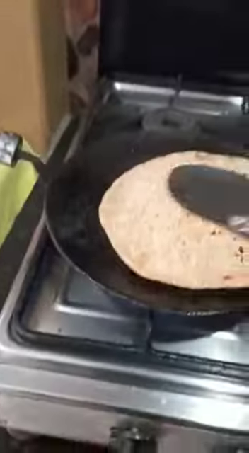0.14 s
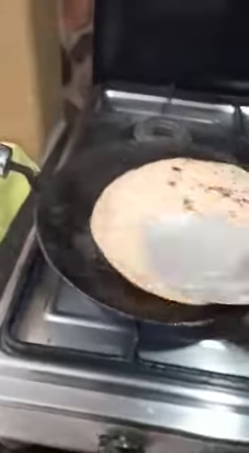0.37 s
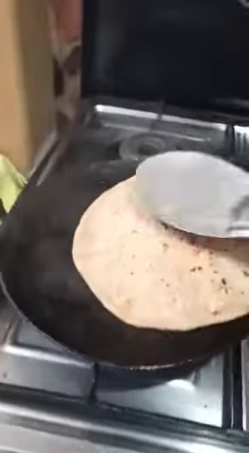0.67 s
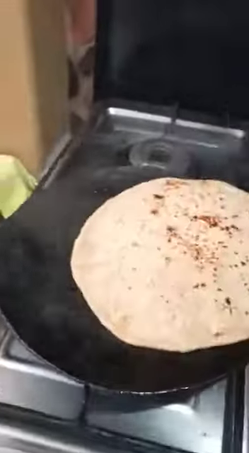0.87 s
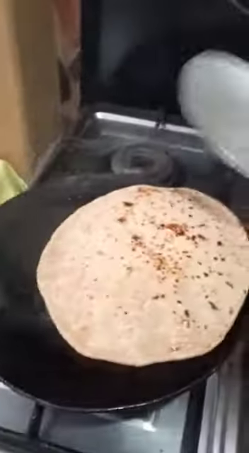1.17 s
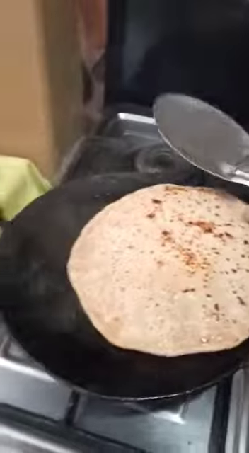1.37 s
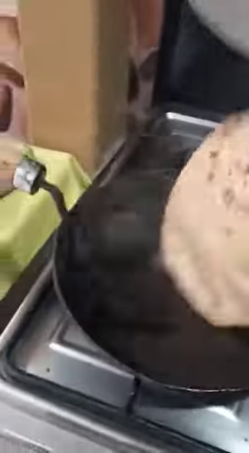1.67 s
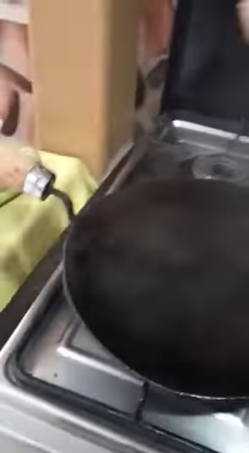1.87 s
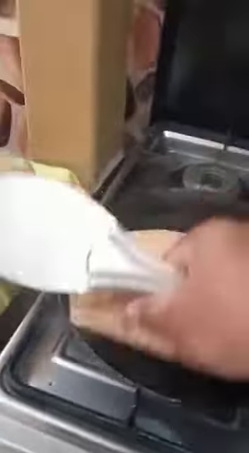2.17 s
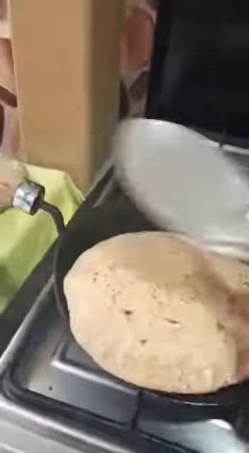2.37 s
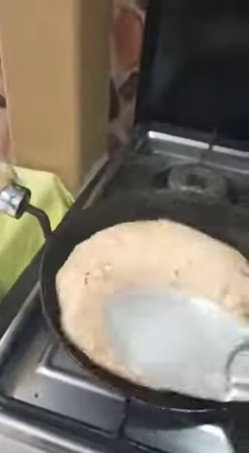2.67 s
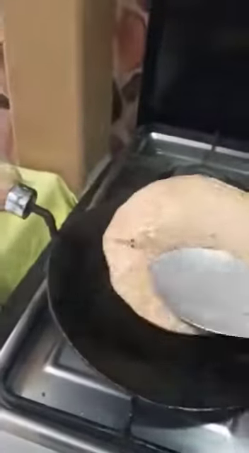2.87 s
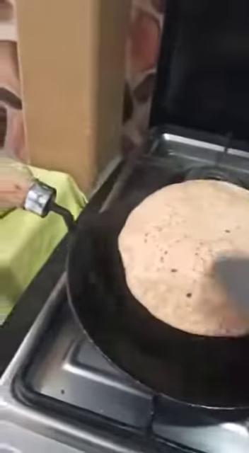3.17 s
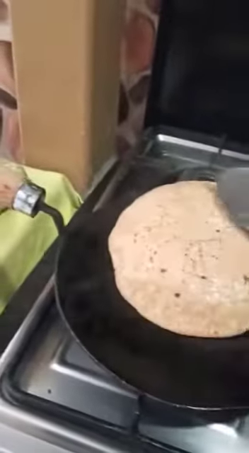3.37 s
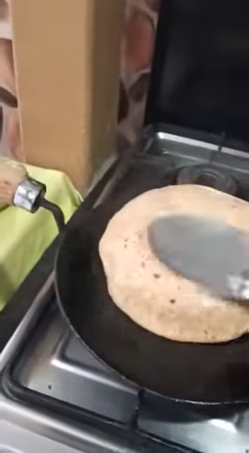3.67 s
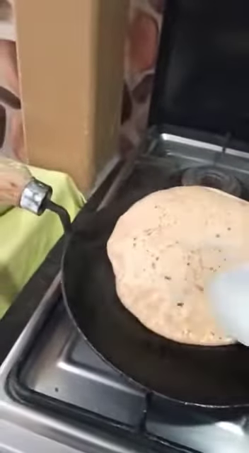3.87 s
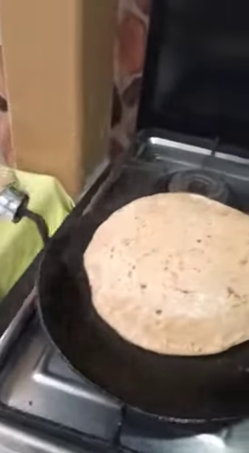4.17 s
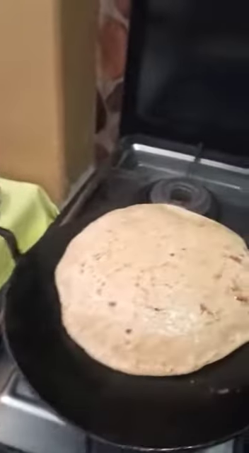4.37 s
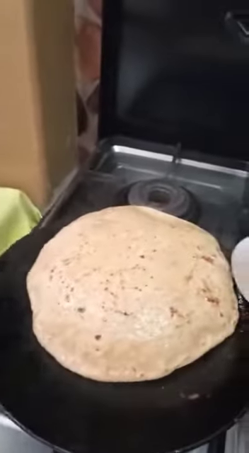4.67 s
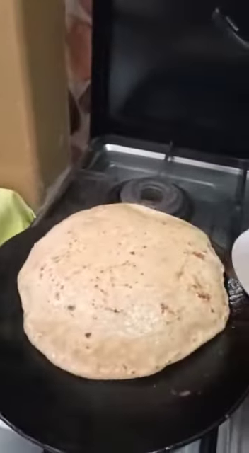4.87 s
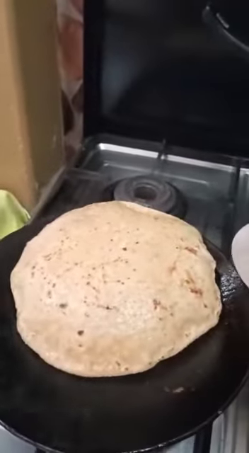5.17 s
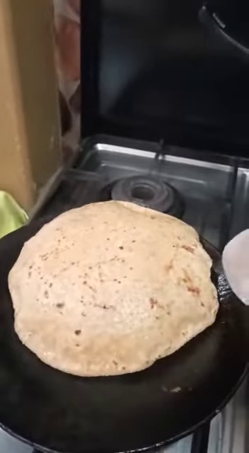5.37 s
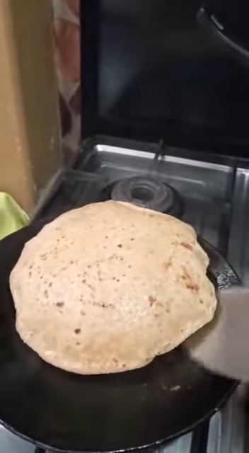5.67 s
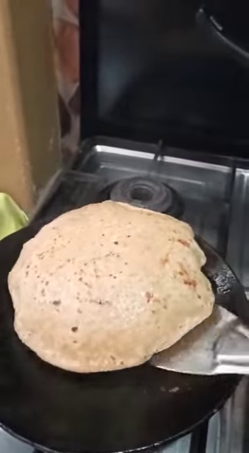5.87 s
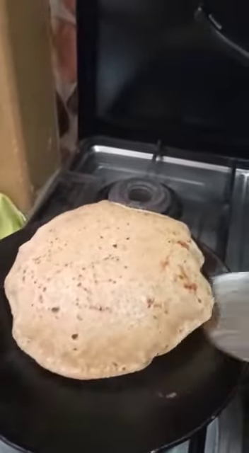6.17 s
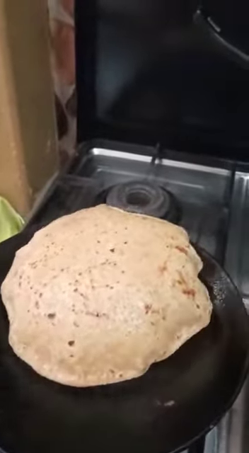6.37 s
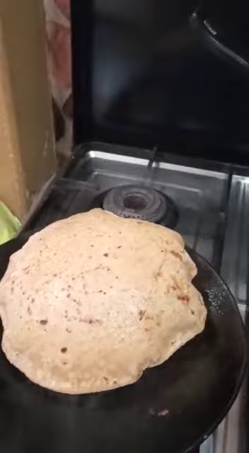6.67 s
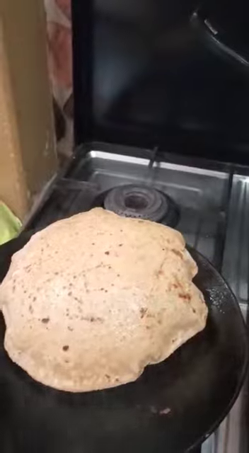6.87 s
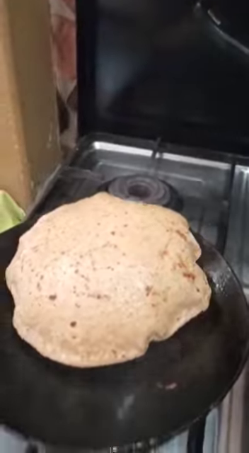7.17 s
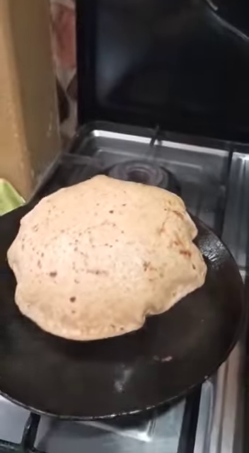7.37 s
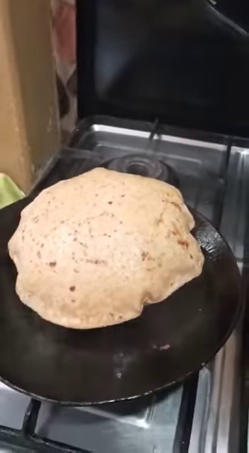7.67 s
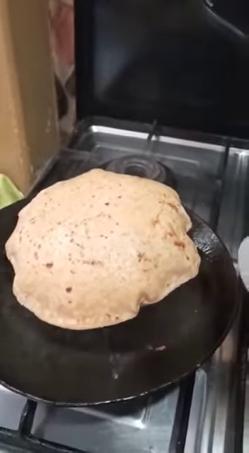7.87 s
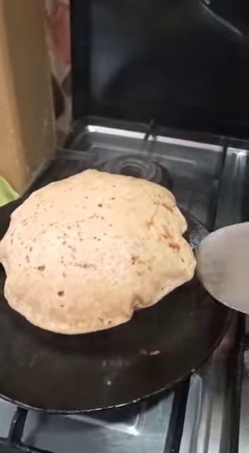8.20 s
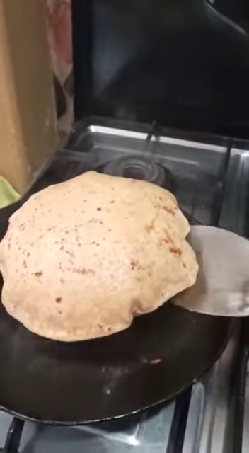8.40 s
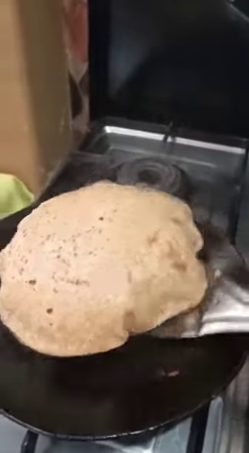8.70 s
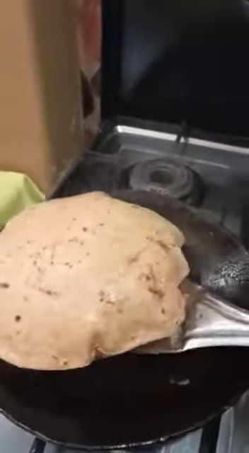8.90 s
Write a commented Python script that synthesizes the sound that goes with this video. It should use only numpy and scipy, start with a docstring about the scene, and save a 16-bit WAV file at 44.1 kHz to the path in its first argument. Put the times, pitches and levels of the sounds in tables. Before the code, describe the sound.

Flatbread sizzles and pops on a hot griddle, is flipped with soft thuds and a slap, then a metal blade scrapes and squeaks on iron.

```python
"""A flatbread cooks on an iron griddle over a gas flame in a small kitchen: filtered noise makes the flame's rush.
At first a steel spatula rubs and presses the bread; grains of noise rasp, sizzle and tick, with single pops.
Near 2 s it is flipped with soft, low thuds and a slap; clinks of noise ring modes of steel and iron.
From 4 s thin jets of steam hiss through gliding resonances as the bread puffs up.
From 5.4 s the blade clinks and scrapes under the rim, its slips driving notes and a growl; pops return near 6 s."""
import sys
import numpy as np
from scipy import signal
from scipy.fft import rfft, irfft
from scipy.io import wavfile
from scipy.ndimage import map_coordinates

SR = 44100
rng = np.random.default_rng(int(sys.argv[2]) if len(sys.argv) > 2 else 0)


def wav_out(sig):
    """Save sig, one row per channel (or a flat mono array), as 16-bit PCM at SR to the path in sys.argv[1]."""
    wavfile.write(sys.argv[1], SR, np.round(np.clip(np.atleast_2d(sig).T, -1, 1) * 32767).astype(np.int16))


N = 398663

# All levels are relative: each layer has its own trim further down.
# colour of the burner's rush: (frequency [Hz], level [dB])
FLAME_COLOUR = [(30, -8), (50, -11), (90, 6.5), (200, -0.5), (320, 5.5), (500, -1.5), (800, -5.5),
                (1500, -8.5), (3200, -12), (4300, -9), (5400, -13), (7300, -27), (12500, -34),
                (15500, -12.5)]
# boil under the bread; it dies at the flip and builds again on the fresh side:
# (time [s], level [dB], left-right [dB])
SIMMER = [(0.0, -47.5, 6), (0.7, -42, -2), (1.38, -50, 0), (1.95, -48, -6), (2.03, -61, 4), (2.55, -64, 1),
          (2.75, -58.5, -2), (4.1, -56, -2), (4.6, -58.5, 0.5), (5.2, -55.5, -3), (6.65, -50, -1.5),
          (6.95, -58.5, -3), (7.3, -56, -3), (7.9, -57.5, -3.5)]
# the boil flares when the bread is pressed or shifted onto hot iron:
# (start [s], length [s], sag or growth [dB], level [dB], left-right [dB])
FLARES = [(0.0, 0.033, -15, -34, 17), (0.278, 0.088, 4.5, -46.5, 20), (0.367, 0.26, -9, -36, 3),
          (1.401, 0.14, -0.5, -41, -5), (1.508, 0.32, -9.5, -31, 0), (2.062, 0.11, -13, -38, -7),
          (2.661, 0.19, -1, -51, 8), (2.925, 0.11, 2, -56, -2), (3.474, 0.18, 0, -54, -2),
          (3.898, 0.12, 6, -55, -1), (6.173, 0.14, -13.5, -30, -3), (6.357, 0.15, -8, -48, -2)]
# colour of the sizzle: (frequency [Hz], level [dB])
FRYING_COLOUR = [(40, -72), (300, -23), (1000, -23.5), (2000, -14), (3200, -10.5), (4500, 0.5), (5400, -10),
                 (6400, 3), (7500, 6), (8300, -3.5), (12000, -7.5), (15500, -0.5)]
# bursting blisters and droplets; the top octave against the rest steers the tilt:
# (time [s], level [dB], left-right [dB], top octave [dB])
POPS = [(0.372, -28, 7, -10), (0.389, -42, 5, -2), (0.4507, -29, 7, -4), (0.4992, -23.5, 7, -6),
        (0.5235, -23.5, 4, -6), (0.6575, -27.5, 5, -8), (0.665, -21, 2, 1), (0.7063, -28, 8, 13),
        (1.09, -41, 7, -17), (1.175, -32, 2, -10), (1.1797, -39, 0, -8), (1.53, -27, -2, -18),
        (1.6905, -24, -3, -36), (1.7032, -21.5, -2, -35), (1.746, -23, -1, -19), (1.7766, -20, 10.5, -21),
        (1.7792, -18.5, -9, -26), (2.008, -32.5, -6, 6), (2.629, -33.5, 7, -32), (3.1836, -38, 2, -18),
        (3.2913, -37.5, -1, -7), (5.962, -27, 0, -7), (6.168, -25, 1, -24), (6.185, -25, 0, -23),
        (6.2052, -25, 2, -20), (6.216, -23, 0, -4), (6.247, -25.5, -0.5, -10), (6.3642, -34, -3, -23),
        (6.3706, -29, 0, -32), (6.3985, -29, 5, -25), (6.4924, -34, 1, -12), (6.568, -24.5, -3, 14),
        (7.2138, -36, 3, -34), (7.466, -31, -4, 1), (7.467, -33.5, -3, -34)]
# colour of pops and ticks: (frequency [Hz], level [dB])
SNAP_COLOUR = [(60, -50.5), (1000, -24.5), (3000, -17), (5400, -9.5), (7300, 6.5), (8500, -1.5),
               (12000, -5.5), (15500, -5.5)]
# strokes of the flat blade over the bread:
# (start [s], length [s], sag or growth [dB], dull push [dB], dry rasp [dB])
RUBS = [(0.0, 0.014, -10.5, -47, -41.5), (0.08, 0.22, 2, -45.5, -54.5), (0.24, 0.083, 4, -42.5, -45),
        (0.36, 0.17, 1, -43, -47), (0.53, 0.11, 2.5, -47.5, -57.5), (0.62, 0.018, -5, -33, -44),
        (0.69, 0.32, -1.5, -60, -72), (1.08, 0.34, -15, -52.5, -58), (1.41, 0.079, 1, -60, -53.5),
        (1.51, 0.34, -12, -54, -44.5), (2.075, 0.058, -8, -35, -41.5), (2.15, 0.16, -2, -50.5, -52),
        (2.29, 0.46, -8, -58, -69), (2.63, 0.235, -5.5, -44.5, -51), (2.93, 0.062, -5, -52, -52),
        (2.99, 0.067, -6, -50, -49), (3.12, 0.026, -1.5, -49.5, -63), (3.47, 0.17, 3, -50.5, -61),
        (3.65, 0.31, 10.5, -65.5, -65), (3.9, 0.036, -13, -58, -44.5), (3.95, 0.074, 9, -58.5, -65)]
# colour of shoves into the griddle: (frequency [Hz], level [dB])
PUSH_COLOUR = [(35, -66), (90, -16.5), (170, -16), (250, -16.5), (340, 1.5), (500, -1), (750, -13),
               (1200, -22), (4000, -70)]
# colour of dry rasp and slap: (frequency [Hz], level [dB])
RASP_COLOUR = [(40, -48), (250, -2.5), (700, 8.5), (1200, 5), (2000, 5.5), (3200, 4), (4500, 6), (8000, -3),
               (15000, -12.5)]
# bread and blade landing softly on the griddle: (time [s], thump [dB], pitch [Hz], slap [dB])
THUDS = [(0.091, -28, 455, -55), (0.248, -30, 425, -51), (.111, -26, 450, -56), (.625, -24, 415, -56),
         (.634, -31, 486, -44), (2.0676, -20, 523, -38), (2.086, -22.5, 406, -41), (2.11, -22, 386, -42),
         (2.1997, -24, 400, -21.5), (2.242, -18.5, 417, -26), (2.256, -27, 444, -31),
         (2.627, -19.5, 404, -36), (3.143, -40, 417, -37.5), (4.003, -40, 740, -54),
         (4.016, -36.5, 530, -48), (9.006, -39, 330, -41.5)]
# steel striking iron:
# (time [s], level [dB], brightness [dB per octave], chatter t60 [s], griddle ring [dB], left-right [dB])
CLINKS = [(2.2005, -22.5, 1, 0.004, -23, -1.5), (2.243, -33.5, -3, 0.014, -5.5, 1),
          (2.257, -37, -3, 0.02, -28, 0), (5.4326, -30.5, -3.5, 0.042, -19, 0),
          (6.3982, -28.5, 3, 0.019, -28, 1.5), (7.9975, -21.5, -1, 0.06, -17, -5),
          (7.9992, -21.5, 0, 0.085, -26, -5), (8.152, -30.5, -1, 0.05, -18, 0),
          (8.158, -35, 0, 0.03, -26, 0), (8.337, -35.5, -1, 0.035, -21, 1.5)]
# colour of the clinks' chatter: (frequency [Hz], level [dB])
STRIKE_COLOUR = [(50, -62), (300, -41), (800, -22), (1500, -4.5), (2000, 1.5), (2650, -13.5), (3200, -4),
                 (5000, -6), (5450, -10.5), (6150, 3.5), (7700, 4), (8400, -1), (12500, -9), (15500, -6)]
# ringing modes of the griddle: (frequency [Hz], energy [dB], t60 [s])
IRON_MODES = [(257.6, -4, 0.7), (316, 0, 0.55), (380, -4, 0.15), (470, -10, 0.6), (530, 0, 0.2),
              (705, -9, 0.8), (835, -11, .6), (1136, -3.5, .9), (1217, -13, .5), (1809, -11, 0.62),
              (2440, -17, 0.48), (2509, -16, .6), (3219, -19, .8), (5293, -29, .4), (8182, -26, 0.32)]
# ringing modes of the blade: (frequency [Hz], energy [dB], t60 [s])
STEEL_MODES = [(1540, -15, .1), (1920, -15, .08), (2983, -16, .12), (3120, -15, .12), (3404, -13, .15),
               (3830, -16, .15), (4176, -12, .15), (4730, -16, .1), (5250, -13, .2), (5714, -11, .15),
               (6146, -3, .12), (6232, -2, .14), (6390, -7, .15), (6640, -4, .12), (6820, -6, .15),
               (7330, -6, .15), (7447, 1, .2), (7619, -2, .2), (7950, -11, .2)]
# steam leaking from the swollen bread:
# (start [s], length [s], level [dB], opening pitch [Hz], closing pitch [Hz], width [share of opening pitch])
JETS = [(4.15, 0.55, -61, 6950, 5650, 0.1), (4.03, 0.68, -60, 4700, 3850, 0.08),
        (4.88, 0.58, -61, 12800, 12000, 0.077), (4.95, 0.39, -61, 14000, 13000, 0.099)]
# shoves of the blade along the iron:
# (start [s], length [s], sag or growth [dB], edge [dB], flex of the blade [dB], push on the griddle [dB],
#  low note [dB], main note [dB], upper note [dB], top note [dB])
SCRAPES = [(5.49, 0.1, -1.5, -52, -43.5, -53.5, -54, -50.5, -68, -72),
           (5.595, 0.071, -6.5, -34, -49, -56, -74, -46, -66, -60),
           (5.66, 0.073, -2, -35.5, -50.5, -58, -79, -48.5, -57, -62),
           (5.74, 0.059, 0, -33.5, -41.5, -50, -74, -42, -40, -58),
           (5.805, 0.072, -2.5, -32.5, -28.5, -29.5, -65, -40, -47, -64),
           (5.895, 0.058, -4.5, -36.5, -44, -44.5, -52.5, -65, -65, -65),
           (5.985, 0.028, 0.5, -46.5, -42.5, -39.5, -66, -58, -58, -66),
           (6.025, 0.05, 3, -40.5, -40.5, -48, -71, -58, -55, -68),
           (6.075, 0.062, -1, -29, -42.5, -41.5, -56, -49, -40, -42),
           (6.155, 0.056, -2.5, -40, -48, -46, -62, -60, -57, -58),
           (6.25, 0.13, -8.5, -53, -62, -52, -65, -72, -62, -55),
           (8.03, 0.078, -5, -44.5, -45.5, -47, -62, -71, -66, -64),
           (8.21, 0.21, -7, -48.5, -50, -58, -70.5, -60, -77, -56),
           (8.375, 0.026, 2.5, -42.5, -43.5, -52, -70, -65, -56, -60),
           (8.41, 0.065, -6, -37, -35, -48, -74, -68, -51, -45),
           (8.48, 0.16, 1.5, -47, -53, -46, -70, -72, -79, -59.5),
           (8.635, 0.046, -4.5, -38.5, -43.5, -50, -75, -54, -65, -47),
           (8.68, 0.12, -1.5, -43, -47, -43.5, -78, -53, -59, -55),
           (8.81, 0.018, -2, -55, -44, -38, -58, -64, -51, -53),
           (8.85, 0.03, -6, -62, -56, -45, -76, -69, -61, -68),
           (9.005, 0.03, -6, -49, -48, -39, -57, -75, -74, -68)]
# the blade's resonances shift with its point of contact on the iron:
# (time [s], drone [Hz], main note [Hz], upper note [Hz], top note [Hz])
CONTACT = [(5.49, 280, 1560, 2800, 3900), (5.54, 285, 1850, 2850, 3950), (5.6, 300, 1970, 2900, 4000),
           (5.69, 315, 2090, 3000, 4100), (5.77, 350, 2060, 2930, 4150), (5.83, 430, 2030, 3000, 4150),
           (5.93, 350, 2030, 3000, 4100), (6.03, 335, 1940, 2980, 4050), (6.09, 318, 2170, 3010, 4150),
           (6.15, 300, 2120, 2960, 4270), (6.25, 289, 2120, 2900, 4300), (8.05, 272, 2070, 3050, 4150),
           (8.27, 280, 2140, 3100, 4250), (8.36, 290, 1960, 3000, 4100), (8.48, 315, 2120, 3100, 4300),
           (8.68, 338, 2020, 3030, 4170), (8.76, 328, 1990, 2980, 4000), (8.85, 316, 1950, 2980, 3980)]
# damping of the blade's notes: (low [Hz], main [Hz], upper [Hz], top [Hz])
NOTE_WIDTHS_HZ = (150, 130, 260, 480)
# colour of the scraping edge: (frequency [Hz], level [dB])
EDGE_COLOUR = [(40, -66), (300, -28), (900, -21), (1900, -6), (2550, -5), (3000, -1.5), (3600, -1),
               (4300, 1.5), (4950, -0.5), (5400, -3.5), (5800, -3), (6300, 8.5), (7500, 15), (8300, -32),
               (12500, 0.5), (15500, -8)]
# modes that ring when the edge digs in: (frequency [Hz], energy [dB], t60 [s])
BITE_MODES = [(2056, -9, .04), (3404, -2, .06), (5714, -2, .05), (6232, -2, .03), (6650, -3, .03)]
# the kitchen's decay: (frequency [Hz], t60 [s])
ROOM_DECAY = [(150, 1), (500, 0.15), (2000, 0.18), (7000, 0.16), (15000, 0.21)]
# the two microphone ports differ in colour: (frequency [Hz], left-right [dB])
PORT_TILT = [(200, 0), (380, 1), (650, -4.5), (1300, -1.5), (2300, 2.5), (4400, 3.5), (7500, 1.5),
             (14000, -2)]
# edges of the treble notch: (lower [Hz], upper [Hz])
NOTCH_HZ = (8650, 11550)

FLARE_RISE_S, FLARE_RELEASE_S = 0.018, 0.02
RUB_RISE_S, RUB_RELEASE_S = 0.0076, 0.016
SCRAPE_RISE_S, SCRAPE_RELEASE_S = 0.0035, 0.016
SPATTER_DB = 0.5  # stray droplets against the boil
KNOCK_LOW_HZ = 400  # the light, hard edge hardly stirs the iron's modes below this
JET_ARCH = 0.27  # below 1, a leak opens quickly and holds
LOW_NOTE_SHARE = 0.451  # pitch of the low note against the main note
SQUEAK_HZ = 7390
# contact detunes, shades and damps each mode of the blade
SWAY_SHARE, SWAY_DB, GRIP_WIDTH_HZ = 0.005, 5.5, 75
DRONE_LIMIT_DB = -44  # pushed harder than this, the growl levels off while the rumble keeps growing
DRONE_JITTER = 0.058  # pitch wander, as a share, under light load
RIM_HZ, RIM_DB = 1136, -18  # a clear mode of the griddle sings on under the push
CUT_HZ = 16000


def amp(db):
    """Decibels to gain."""
    return 10 ** (np.asarray(db) / 20)


def unit(x):
    """Scales to rms 1."""
    return x / np.sqrt(np.mean(x ** 2) + 1e-20)


def read(points, hz):
    """Reads a table on a log-frequency axis."""
    f, value = np.transpose(points)
    return np.interp(np.log(hz + 1), np.log(f + 1), value)


def track(rows, order):
    """One column of a curve at every sample."""
    rows = np.array(rows)
    return np.interp(np.arange(N) / SR, rows[:, 0], rows[:, order])


def add(mix, s, sound):
    """Mixes a sound in at time s."""
    part = mix[..., max(round(s * SR), 0):][..., :sound.shape[-1]]
    part += sound[..., :part.shape[-1]]


def strokes(rows, rise_s, release_s, order):
    """Gain of one dB column: each stroke rises, sags or grows, then dies away; overlaps add in power."""
    power = np.zeros(N)
    for row in rows:
        start, length, sag_db = row[:3]
        t = np.arange(0, length + 8 * release_s, 1 / SR)
        held = amp(row[order] + sag_db * np.minimum(t / length, 1))
        rise = np.minimum(t / rise_s, 1)
        release = np.exp(-np.maximum(t - length, 0) / release_s)
        add(power, start, (held * rise * release) ** 2)
    return np.sqrt(power)


def colour(x, points, tilt_db=0):
    """Minimum-phase filter of energy 1 with the given spectrum, tilted per octave above 1 kHz."""
    hz = np.fft.rfftfreq(4096, 1 / SR)
    log_gain = np.log(amp(read(points, hz) + tilt_db * np.log2(np.maximum(hz, 1000))))
    mirrored = np.r_[log_gain, log_gain[-2:0:-1]]
    response = np.exp(np.conj(signal.hilbert(mirrored)))[:len(hz)]
    taps = irfft(response)[:len(hz)]
    return signal.oaconvolve(x, taps / np.linalg.norm(taps))[:len(x)]


def ring(x, modes):
    """Drives a set of decaying modes whose dB column is their relative energy."""
    t = np.arange(SR) / SR
    taps = np.zeros(SR)
    for hz, db, t60 in modes:
        taps += amp(db - 60 * t / t60) / np.sqrt(t60) * np.sin(2 * np.pi * hz * t)
    return signal.oaconvolve(x, taps / np.linalg.norm(taps))[:len(x)]


def resonate(x, hz, width_hz):
    """A moving two-pole resonance with steep skirts: shifts the pitch to zero, smooths, shifts back."""
    turn = np.exp(2j * np.pi * np.cumsum(hz) / SR)
    r = np.exp(-np.pi * width_hz / SR)
    return (turn * signal.lfilter([(1 - r) ** 2], [1, -2 * r, r * r], x / turn)).real


def wobble(rate_hz):
    """Random drift: straight lines between normal random values drawn rate_hz times a second."""
    knots = rng.standard_normal(N // 20)
    return np.interp(np.arange(N) * rate_hz / SR, np.arange(len(knots)), knots)


def grains(per_s, spread_db):
    """Random tiny impacts of rms 1, a few much larger than the rest."""
    size = amp(spread_db * np.minimum(rng.exponential(1, N), 5))
    sign = rng.choice([-1, 1], N)
    return unit(size * sign * (rng.random(N) < per_s / SR))


def ports(x, lead_ms, pan_db):
    """Two microphone ports; the left one hears the sound lead_ms earlier."""
    at = np.arange(len(x))
    right = map_coordinates(x, [at - lead_ms * SR / 1000], order=3)
    return np.array([x * amp(pan_db / 2), right * amp(-pan_db / 2)])


def kitchen(pair, wet_db, near_db=-3, near_t60=0.016):
    """Quick reflections from the hob and its lid, then the room; bass reflections stay alike in both ears."""
    size = SR // 2
    taps = rng.choice([-1., 1.], (2, size)) * (rng.random((2, size)) < .12)
    taps[:, :40] = 0  # a short gap after the direct sound
    hz, t, z = signal.stft(taps, SR, nperseg=256)
    same = 1 / (1 + (hz[:, None] / 750) ** 2)
    z[1] = same * z[0] + np.sqrt(1 - same ** 2) * z[1]
    room = amp(-60 * t / read(ROOM_DECAY, hz)[:, None])
    near = amp(near_db - 60 * t / near_t60)
    tail = signal.istft(z * (room + near), SR, nperseg=256)[1]
    wet = signal.oaconvolve(pair, tail / np.linalg.norm(tail[0]), axes=1)[:, :N]
    return (pair + amp(wet_db) * wet) / np.sqrt(1 + amp(wet_db) ** 2)


def flame():
    """The burner's even rush: turbulent noise, partly shared between the sides, fluttering slowly."""
    left, right, shared = (unit(colour(rng.standard_normal(N), FLAME_COLOUR)) for _ in range(3))
    flutter = amp(1.0 * wobble(rate_hz=8))
    return amp(-59.54) * (np.array([left, right]) + 0.67 * shared) * flutter


def boil():
    """Level and left-right balance of the boiling, in dB: simmer and flares add in power."""
    power = amp(track(SIMMER, order=1)) ** 2
    lean = power * track(SIMMER, order=2)
    for row in FLARES:
        flare = strokes([row], FLARE_RISE_S, FLARE_RELEASE_S, order=3) ** 2
        power, lean = power + flare, lean + flare * row[4]
    return 10 * np.log10(power), lean / power


def sizzle(level_db, pan_db):
    """Thousands of tiny bursts a second; harder boiling is brighter."""
    bursts = grains(per_s=9000, spread_db=2.5) * amp(0.62 * wobble(rate_hz=76))
    fierce = np.clip((level_db + 55.0) / 20, 0, 1)
    gentle_hiss = colour(bursts, FRYING_COLOUR, tilt_db=-3.5)
    fierce_hiss = colour(bursts, FRYING_COLOUR)
    hiss = (1 - fierce) * gentle_hiss + fierce * fierce_hiss
    return kitchen(ports(hiss * amp(level_db + 2.5), lead_ms=0.15, pan_db=pan_db), wet_db=0.0)


def pops(boil_db):
    """Single bursts, each a click with a brief noise tail, among smaller ticks that grow with the boil."""
    droplets = colour(grains(per_s=130, spread_db=2.2), SNAP_COLOUR)
    out = ports(droplets * amp(boil_db + SPATTER_DB), lead_ms=0.053, pan_db=3.0)
    t = np.arange(600) / SR
    for s, db, pan_db, top_db in POPS:
        burst = (t == 0) + .25 * rng.standard_normal(len(t)) * np.exp(-t / .0003)
        tilt_db = np.clip(0.28 * (top_db + 20), -6, 9)
        snap = colour(burst / np.linalg.norm(burst), SNAP_COLOUR, tilt_db=tilt_db)
        add(out, s, ports(amp(db + 20.5) * snap, lead_ms=0.018, pan_db=pan_db))
    return kitchen(out, wet_db=-4, near_db=2, near_t60=.02)


def rub():
    """The flat of the blade drags over the crust: soft shoves into the griddle and a dry rasp."""
    grip = amp(1.76 * wobble(rate_hz=55))
    push = strokes(RUBS, RUB_RISE_S, RUB_RELEASE_S, order=3)
    rasp = strokes(RUBS, RUB_RISE_S, RUB_RELEASE_S, order=4)
    shoves = colour(grains(per_s=700, spread_db=2.0), PUSH_COLOUR) * grip * push
    crumbs = colour(grains(per_s=5000, spread_db=2.5), RASP_COLOUR) * grip * rasp
    body = amp(-2.5) * shoves + amp(-25) * ring(shoves, IRON_MODES)
    dull = kitchen(ports(body, lead_ms=0.025, pan_db=-1.5), wet_db=-7.5)
    dry_rasp = kitchen(ports(amp(1.0) * crumbs, lead_ms=0.099, pan_db=-2), wet_db=5.0)
    return dull + dry_rasp


def thuds():
    """Soft blows: a few low cycles, a short slap, and the iron humming on."""
    low, slaps = np.zeros(N), np.zeros(N)
    t = np.arange(2048) / SR
    for s, thump_db, hz, slap_db in THUDS:
        swell = (1 - np.exp(-t / 0.0019)) * np.exp(-t / 0.0023)
        add(low, s, amp(thump_db + 4.5) * swell * np.sin(2 * np.pi * hz * t))
        slap = np.exp(-t / 0.0039) * colour(rng.standard_normal(len(t)), RASP_COLOUR)
        add(slaps, s, amp(slap_db - 5.5) * slap)
    hum = amp(-27.0) * ring(low, IRON_MODES) + amp(-34) * ring(slaps, IRON_MODES)
    return kitchen(ports(low + slaps + hum, lead_ms=0.065, pan_db=-2.5), wet_db=-9.0)


def clinks():
    """The thin blade lands and chatters for a moment; the first contact sets the iron ringing."""
    blows, knocks = np.zeros((2, N)), np.zeros(N)
    t = np.arange(SR // 4) / SR
    for s, db, bright_db, t60, ring_db, pan_db in CLINKS:
        fade = 10 ** (-3 * t / t60) + 1.22 * np.exp(-t / 0.00065)
        chatter = colour(rng.standard_normal(len(t)) * fade, STRIKE_COLOUR, tilt_db=bright_db)
        add(blows, s, ports(amp(db) * chatter, lead_ms=-0.015, pan_db=pan_db))
        add(knocks, s, amp([ring_db]))  # the first contact, a single click
    knocks = signal.sosfilt(signal.butter(2, KNOCK_LOW_HZ, "highpass", fs=SR, output="sos"), knocks)
    blade_ring = np.array([ring(side, STEEL_MODES) for side in blows])
    steel = blows + amp(-16) * blade_ring + amp(-1.5) * ring(knocks, IRON_MODES)
    return kitchen(steel, wet_db=5.0)


def jets():
    """Thin, fluttering hisses that swell, fade and sink in pitch as each leak widens."""
    hiss = np.zeros(N)
    for start, length, db, open_hz, close_hz, width in JETS:
        u = np.arange(0, length, 1 / SR) / length
        pitch_hz = open_hz + (close_hz - open_hz) * u
        jet = unit(resonate(rng.standard_normal(len(u)), pitch_hz, width_hz=width * open_hz))
        add(hiss, start, amp(db) * jet * abs(np.sin(np.pi * u)) ** JET_ARCH)
    flutter_hz = 70 + 10 * wobble(rate_hz=8)
    hiss = hiss * amp(2 * np.sin(2 * np.pi * np.cumsum(flutter_hz) / SR))
    return kitchen(ports(hiss, lead_ms=0.15, pan_db=-2.0), wet_db=0)


def blade_notes(slips, gains, bends_hz):
    """The blade's low, main, upper and top notes, bending with the point of contact."""
    pitches_hz = [LOW_NOTE_SHARE * bends_hz[0]] + bends_hz
    notes = np.zeros(N)
    for gain, hz, width_hz in zip(gains, pitches_hz, NOTE_WIDTHS_HZ):
        wandering_hz = hz * (1 + .02 * wobble(rate_hz=60))
        notes += gain * unit(resonate(slips, wandering_hz, width_hz))
    return notes


def gripped_modes(slips):
    """The blade's own modes, swaying in pitch and level while contact damps them."""
    tones = np.zeros(N)
    for hz, db, _ in STEEL_MODES:
        level = amp(db + SWAY_DB * wobble(rate_hz=16))
        swaying_hz = hz * (1 + SWAY_SHARE * wobble(rate_hz=20))
        tones += level * resonate(slips, swaying_hz, GRIP_WIDTH_HZ)
    return unit(tones)


def griddle_drone(slips, catch, push, drone_hz):
    """The push sticks and slips in near-regular cycles, more raggedly under load."""
    shoves = colour(grains(per_s=2300, spread_db=3.5), PUSH_COLOUR) * catch
    load = np.tanh(push / amp(DRONE_LIMIT_DB))
    jitter = DRONE_JITTER * (1 + load ** 4) * wobble(rate_hz=300)
    turns = np.cumsum(drone_hz * (1 + jitter)) / SR
    cycles = unit(np.sin(2 * np.pi * turns) * amp(1.8 * wobble(rate_hz=60)))
    growl = amp(DRONE_LIMIT_DB) * load * cycles
    rim = amp(RIM_DB) * resonate(slips * load, np.full(N, RIM_HZ), width_hz=10)
    rumble = amp(-8) * unit(shoves) + amp(-13) * unit(ring(shoves, IRON_MODES))
    return rumble * push * load + growl + rim


def scrape():
    """The edge catches and slips on rough iron, ringing the blade; its push makes the griddle growl."""
    edge, flex, push, *note_gains = (
        strokes(SCRAPES, SCRAPE_RISE_S, SCRAPE_RELEASE_S, order=k) for k in range(3, 10))
    drone_hz, *bends_hz = (track(CONTACT, order=k) for k in range(1, 5))
    catch = amp(1.35 * wobble(rate_hz=69))
    slips = grains(per_s=5000, spread_db=3.0) * catch
    notes = blade_notes(slips, note_gains, bends_hz)
    squeak = unit(resonate(slips, np.full(N, SQUEAK_HZ), width_hz=1170))
    blade = amp(3.0) * unit(colour(slips, EDGE_COLOUR)) + amp(-2.0) * squeak
    blade = blade + amp(-2.0) * gripped_modes(slips)
    # digging in harder roughens the tone and wakes the stiffer modes
    rough = amp(-5.5) * unit(colour(slips, RASP_COLOUR))
    broad_note = amp(-9.0) * unit(resonate(slips, bends_hz[0], width_hz=860))
    grind = (rough + broad_note) * flex
    bite = amp(-8) * unit(ring(slips, BITE_MODES)) * flex
    steel = blade * edge + amp(2) * notes + grind + bite + amp(-19) * ring(grind, IRON_MODES)
    drone = griddle_drone(slips, catch, push, drone_hz)
    bright = kitchen(ports(steel, lead_ms=0.05, pan_db=-1.5), wet_db=6.0)
    deep = kitchen(ports(drone, lead_ms=.02, pan_db=-2.0), wet_db=-7)
    return bright + deep


def scene():
    """Everything at the stove."""
    boil_db, pan_db = boil()
    cooking = flame() + sizzle(boil_db, pan_db) + pops(boil_db)
    return cooking + rub() + thuds() + clinks() + jets() + scrape()


def record(dry):
    """Each port's colour and bass cut, then a deep treble notch and a steep band limit."""
    tilt_db = read(PORT_TILT, np.fft.rfftfreq(N, 1 / SR))
    heard = irfft(rfft(dry) * amp([tilt_db / 2, -tilt_db / 2]), N)
    heard = signal.sosfilt(signal.butter(2, 50, "highpass", fs=SR, output="sos"), heard)
    notch = signal.firwin(301, NOTCH_HZ, window=("kaiser", 7), fs=SR)
    # a little unnotched sound keeps the notch from going silent
    heard = signal.oaconvolve(heard, notch[None], "same") + amp(-31.0) * heard
    band_limit = signal.firwin(401, CUT_HZ, window=("kaiser", 8), fs=SR)
    return signal.oaconvolve(heard, band_limit[None], "same")


dry = scene()
out = record(dry)
wav_out(out)
```